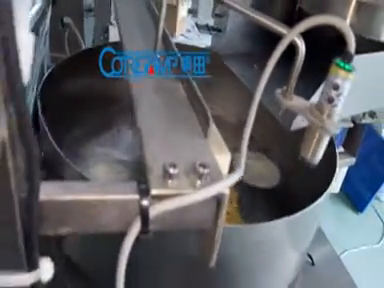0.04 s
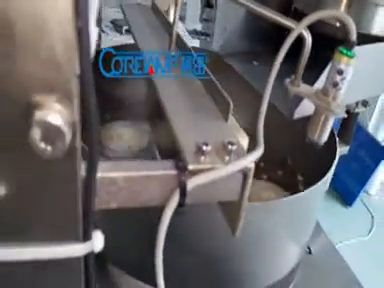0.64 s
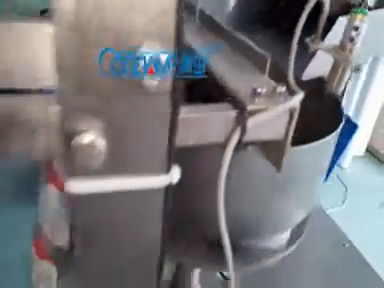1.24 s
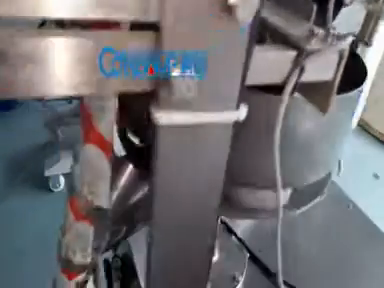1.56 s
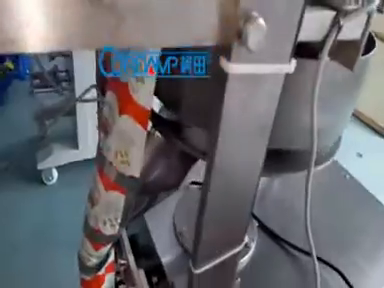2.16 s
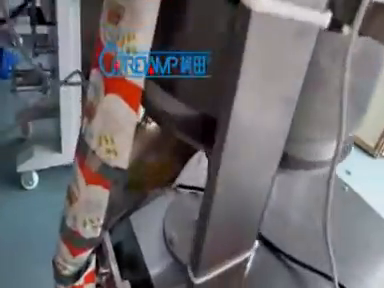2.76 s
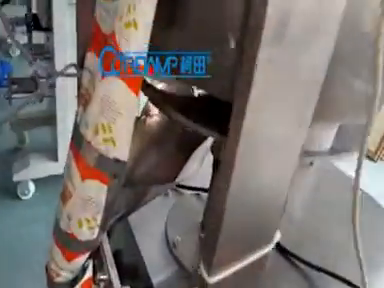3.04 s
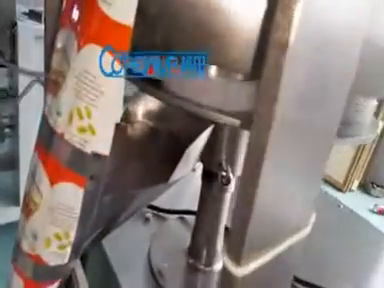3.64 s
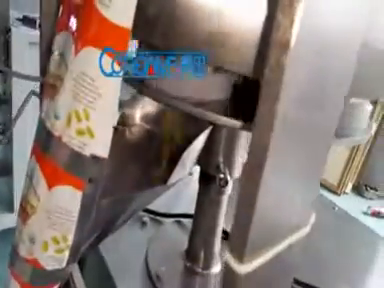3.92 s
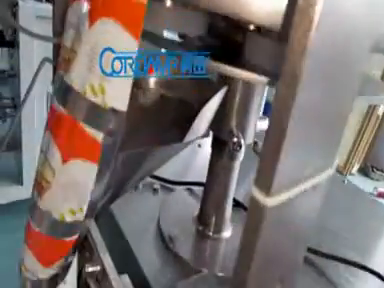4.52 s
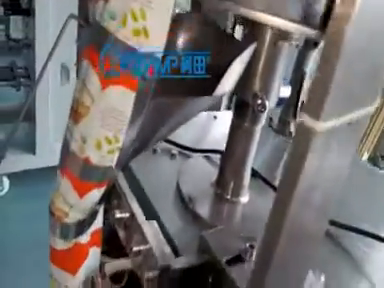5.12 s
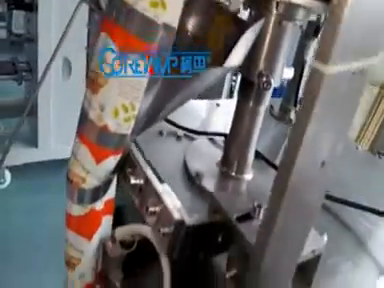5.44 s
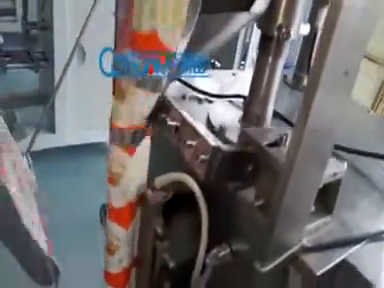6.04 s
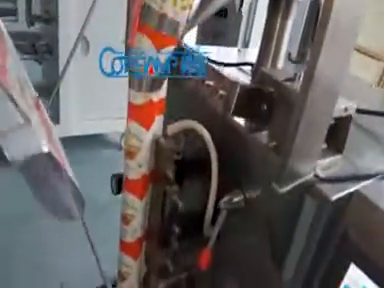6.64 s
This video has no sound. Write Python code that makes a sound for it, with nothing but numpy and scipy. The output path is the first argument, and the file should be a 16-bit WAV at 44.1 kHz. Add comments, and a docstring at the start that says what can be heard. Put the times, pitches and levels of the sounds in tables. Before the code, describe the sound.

A packing machine pours rattling nuts through a steel funnel into crackling plastic bags, its jaws clacking shut over a steady motor hum.

```python
"""Nuts hail onto a ringing steel funnel over the drone of a motor and gearbox.
This is a packing machine in a workshop, heard from close by, filling a bag every 1.35 s.
Each portion rattles and scrapes down a hollow tube and lands in crackling plastic film.
Dry parts squeak, the loose film guide clinks, and the sealing jaws clack shut before the next pour."""
import sys
import numpy as np
from scipy import signal
from scipy.fft import rfft, irfft, next_fast_len
from scipy.io import wavfile
from scipy.ndimage import map_coordinates

SR = 44100
rng = np.random.default_rng(int(sys.argv[2]) if len(sys.argv) > 2 else 0)


def wrap_up_sound(samples):
    """Save the sound to the file named by the first command line argument, as 16-bit audio."""
    columns = np.atleast_2d(samples).T
    # keep every value between -1 and 1, then stretch to whole-number steps
    tamed = np.clip(columns, -1, 1)
    steps = np.round(tamed * 32767).astype(np.int16)
    wavfile.write(sys.argv[1], SR, steps)


N = 298998

# Levels in all tables are relative. A fade time (t60) is the time a sound takes to drop 60 dB.
# The machine's cycles. Each row: time the jaws close in seconds; levels in dB of the clack, frame thud,
# pour, tube rattle, film crackle, drive load and the pour's dull blows; the clack's rise in seconds;
# the cutting blade's pitch in Hz and its level in dB.
CYCLES = [(-0.134, -10, -21, -15.5, -32, -26, -0.5, -36.5, 0.0004, 3300, -22),
          (1.218, -9.5, -19, -17, -28.5, -26.5, -6, -30, 0.00044, 3350, -17),
          (2.572, -8.5, -17, -17.5, -27.5, -26, -3.5, -31, 0.00057, 3360, -18),
          (3.925, -4, -21.5, -15, -28.5, -26, 2.5, -26, 0.0009, 3640, -14),
          (5.2735, -9.5, -16.5, -16, -30.5, -26, 0, -31, 0.002, 3570, -25),
          (6.632, -6.5, -20, -13, -21, -21, 0, -25.5, 0.0008, 3110, -18)]
CLOSE_S, CLACK_DB, _, POUR_DB, TUBE_DB, FILM_DB, LOAD_DB, BLOWS_DB, *_ = np.transpose(CYCLES)


def amp(db):
    """Turn decibels into a gain."""
    return 10 ** (np.asarray(db) / 20)


def unit(x):
    """Scale a signal to an average power of 1."""
    return x / np.sqrt(np.mean(x ** 2) + 1e-20)


def along(points, hz):
    """Read between (Hz, value) points on a musical pitch scale."""
    pitches, values = np.transpose(points)
    return np.interp(np.log(hz + 1), np.log(pitches), values)


def wobble(rate):
    """A smooth curve through rate random values a second."""
    steps = np.arange(0, N * rate / SR + 1, 1 / 10)
    curve = map_coordinates(rng.standard_normal(int(N * rate / SR) + 4), [steps])
    return np.interp(np.arange(N) * rate / SR, steps, curve)


def filtered(x, response):
    """Scale each frequency of x by response(Hz)."""
    size = next_fast_len(N + SR // 2)
    return irfft(rfft(x, size) * response(np.fft.rfftfreq(size, 1 / SR)), size)[..., :N]


def coloured(x, spectrum, size=4096):
    """Give x a tone colour, from (Hz, dB) points, with a filter of energy 1."""
    cepstrum = irfft(np.log(amp(along(spectrum, np.fft.rfftfreq(size, 1 / SR)))))
    cepstrum[1:size // 2] *= 2  # folded so the filter rings after a hit, never before
    cepstrum[size // 2 + 1:] = 0
    impulse = irfft(np.exp(rfft(cepstrum)))
    return signal.fftconvolve(x, impulse / np.linalg.norm(impulse))[:N]


def add(track, s, sound):
    """Mix a sound in at s seconds."""
    start = round(s * SR)
    sound = sound[max(-start, 0):]
    part = track[max(start, 0):][:len(sound)]
    part += sound[:len(part)]


def envelope(start, attack, hold, release):
    """Rise to 1 at start, hold, then fade. Times are in seconds; attack and release each span 20 dB."""
    t = np.arange(N) / SR - start
    early = np.maximum(-t, 0) / attack
    late = np.maximum(t - hold, 0) / release
    return amp(-20 * (early ** 2 + late))


def stage(levels_db, delay, **shape):
    """Repeat an envelope delay seconds after each closing of the jaws, at that cycle's level."""
    gains = [amp(db) * envelope(s + delay, **shape) for s, db in zip(CLOSE_S, levels_db)]
    return np.linalg.norm(gains, axis=0)


def impacts(rate, spread_db):
    """Random hits of uneven size, rate a second, with a steady average power of 1."""
    chance = np.clip(rate / SR, 1e-4, 1)
    sizes = amp(spread_db * np.clip(rng.standard_normal(N), -2, 2)) * rng.choice([-1, 1], N)
    return unit((rng.random(N) < chance) * sizes / np.sqrt(chance))


def bursts(rows, t60, attack):
    """A fading burst of noise for each (seconds, dB) row."""
    out, t = np.zeros(N), np.arange(SR // 3) / SR
    for s, db in rows:
        add(out, s, amp(db - 60 * t / t60) * (1 - np.exp(-t / attack)) * rng.standard_normal(len(t)))
    return out


def shimmer(hits, t60):
    """Each hit on a thin sheet wakes so many high notes that they blur into hiss."""
    decay = amp(-120 * np.arange(SR // 8) / SR / t60)
    energy = np.abs(signal.fftconvolve(hits ** 2, decay / decay.sum())[:N])
    return np.sqrt(energy) * rng.standard_normal(N)


def rasp(hz, width_hz, t):
    """A rough note kept ringing by irregular slips."""
    place = (t - t[0]) * width_hz
    slips = rng.standard_normal((2, int(place[-1]) + 2))
    a, b = [np.interp(place, np.arange(len(row)), row) for row in slips]
    return unit(a * np.cos(2 * np.pi * hz * t) + b * np.sin(2 * np.pi * hz * t))


def swell(rise, hz, roughness):
    """A note that grows for rise seconds, then falls; roughness is its width as a share of its pitch."""
    t = np.arange(-rise, rise, 1 / SR)
    return np.exp(-(2 * t / rise) ** 2) * rasp(hz, roughness * hz, t)


def tone(hz, drift, flutter_db):
    """A machine tone that wavers in level and pitch."""
    level = amp(flutter_db * wobble(12))
    return unit(level * np.sin(2 * np.pi * hz * np.arange(N) / SR + drift * wobble(9)))


def ring(modes, t, attack):
    """A struck part's own notes (modes) fade away, a little different in strength at each blow."""
    strengths_db = 1.5 * rng.standard_normal(len(modes))
    notes = [amp(db + extra_db - 60 * t / t60) * np.sin(2 * np.pi * (hz * t + rng.random()))
             for (hz, db, t60), extra_db in zip(modes, strengths_db)]
    return (1 - np.exp(-t / attack)) * sum(notes)


def pings(count, hz, octaves, t60, spread_db):
    """Scattered tiny ticks, each with its own pitch and size."""
    when, pitch, size = rng.random((count, 3)).T
    t = np.arange(SR // 40) / SR
    pitches = hz * 2 ** (octaves * (2 * pitch - 1))
    grains = amp(spread_db * size[:, None] - 60 * t / t60) * np.sin(2 * np.pi * pitches[:, None] * t)
    places = (when * N).astype(int)[:, None] + np.arange(len(t))
    return unit(np.bincount(places.ravel(), grains.ravel(), N)[:N])


def clink(hz, db, t60):
    """Loosely held steel buzzes as its ring dies away."""
    t = np.arange(SR // 8) / SR
    return amp(db - 3.5 - 60 * t / t60) * (1 - np.exp(-t / 0.0006)) * rasp(hz, 0.17 * hz, t)


def funnel_response(f):
    """Each note of the steel sheet boosts its own pitch and rings on."""
    # The sheet's notes. Each row: pitch in Hz, width in Hz, boost in dB.
    sheet_modes = [(902, 10, 13), (1424, 22, 11), (2013, 30, 8.5), (2340, 26, 7.5), (2434, 35, 8),
                   (3068, 107, 7.5), (3434, 65, 7.5), (3840, 56, 6.5), (5050, 78, 3.5), (5430, 39, 5.5),
                   (5730, 110, 7), (5350, 87, 1.5), (6170, 53, 9), (6400, 87, 3.5), (6460, 61, 9.5),
                   (7240, 52, 2)]
    return 1 + sum((amp(db) - 1) * 1j * f * width / (hz * hz - f * f + 1j * f * width)
                   for hz, width, db in sheet_modes)


def funnel():
    """Nuts hail on the steel funnel and ring it; a few film crackles share the same bright tone."""
    # Short bright bursts: clumps of nuts during the pours, and crackles of film as it is pulled.
    # Each row: start in seconds, level in dB, fade in seconds.
    bright_bursts = [(0.001, -6, 0.045), (0.018, -13, 0.093), (0.04, -12, 0.065), (0.063, -6.5, .08),
                     (0.09, -5.5, .06), (1.262, -15.5, .07), (1.2805, -8, 0.032), (1.323, -11.5, 0.036),
                     (1.3598, -12, .045), (1.4345, -8, 0.13), (2.6848, -13.5, 0.06), (2.709, -20, 0.094),
                     (3.415, -19.5, 0.079), (3.467, -18.5, .09), (3.9473, -12.5, 0.1), (4.005, -11.5, 0.14),
                     (4.048, -10, .11), (4.119, -8.5, 0.15), (4.386, -12, .11), (4.691, -9, 0.055),
                     (4.816, -15.5, 0.15), (5.3736, -9, 0.077), (5.43, -15, .06), (5.454, -8.5, 0.054),
                     (5.919, -12, 0.076), (6.709, -14, .1)]
    # Tone colours of the bright hits and the dull blows. Each row: frequency in Hz, level in dB.
    bright_colour = [(1300, -29.5), (2900, -10.5), (3700, -10), (4500, -5), (5300, -0.5), (5800, -1),
                     (6400, -7), (6800, -7.5), (7500, -15.5), (8400, -29), (10000, -24), (10700, -38)]
    dull_colour = [(500, -35), (900, -0.5), (1500, -4.5), (2400, 2), (3300, 6), (5000, -32.5)]
    # Notes set singing by where a pour lands. Each row: peak time and rise in seconds, Hz, level in dB.
    singing_notes = [(1.44, 0.09, 2044, -34), (1.44, 0.08, 2950, -37.5), (2.77, 0.12, 1977, -33),
                     (2.79, 0.1, 3080, -33), (2.79, 0.09, 3840, -31.5), (2.78, 0.14, 917, -40.5),
                     (4.2, 0.14, 2495, -33), (5.49, 0.09, 1450, -36), (5.49, 0.1, 6770, -27)]
    pouring = dict(delay=0.22, attack=0.12, hold=0.021, release=0.039)  # the cup empties
    pour = stage(POUR_DB, **pouring)
    slide = stage(POUR_DB, delay=0.16, attack=0.11, hold=0.25, release=0.24)  # nuts slide down the wall
    stream = amp(wobble(65)) * np.hypot(pour, amp(-6) * slide)  # they leave the cup in spurts
    contacts = impacts(4000 * (stream / stream.max() + 0.25), spread_db=2)  # denser in a heavy stream
    hits = stream * contacts
    hits += sum(bursts([(s, db)], t60, attack=0.038 * t60) for s, db, t60 in bright_bursts)
    sizzle = coloured(amp(-6) * hits + amp(-8.5) * shimmer(hits, t60=0.043), bright_colour)
    blows = coloured(stage(BLOWS_DB, **pouring) * contacts, dull_colour)
    out = filtered(sizzle + blows, funnel_response)
    for s, rise, hz, db in singing_notes:
        add(out, s - rise, amp(db) * swell(rise, hz, roughness=0.09))
    return out


def drive():
    """The motor hums; frame rumble, cabinet boom and gearbox whirr grow with each cycle's load."""
    # How loud the rumble and the hum are over time. Each row: time in seconds, level in dB.
    rumble_levels = [(0.05, -29), (1.03, -35.5), (2.95, -30), (3.13, -29), (3.43, -32.5), (4.8, -28.5),
                     (5.64, -33), (6.31, -28), (6.72, -31)]
    hum_levels = [(0.03, -29), (0.36, -42), (0.64, -31), (0.72, -39.5), (0.87, -37.5), (3.42, -50),
                  (4.58, -36), (4.61, -32), (5.08, -40), (5.8, -36), (5.97, -29), (6.16, -31.5),
                  (6.28, -26.5), (6.42, -27.5), (6.52, -32.5), (6.72, -32.5)]
    # Tone colours of the frame and the gearbox. Each row: frequency in Hz, level in dB.
    rumble_colour = [(8, -55), (22, -24), (40, -14), (65, -8.5), (88, -10.5), (115, -1.5), (145, 0),
                     (200, -1), (240, 0.5), (300, -8), (340, -19.5), (420, -16), (600, -18.5), (900, -78)]
    whirr_colour = [(180, -33), (300, -0.5), (406, 2.5), (451, -0.5), (548, -2.5), (647, -6.5), (730, -4.5),
                    (1030, -8), (1110, -9), (3720, -11.5), (4010, -10), (7210, -19), (8140, -29),
                    (9460, -77), (11000, -80), (14300, -80), (22000, -120)]
    # The motor's lasting tones. Each row: pitch in Hz, level in dB.
    motor_tones = [(86.3, -58.5), (132, -47.5), (231, -49), (1561, -57), (3908, -55.5), (4764, -56.5)]
    # Parts singing briefly under load. Each row: peak time and rise in seconds, Hz, level in dB.
    strains = [(0.391, 0.063, 102, -30), (0.305, 0.11, 213.2, -35.5), (3.23, 0.65, 133, -35.5),
               (3.463, 0.24, 1138, -38), (3.72, 0.24, 1172, -40), (4.646, 0.42, 3580, -36.5),
               (4.824, 0.21, 133.6, -27.5), (5.82, 0.3, 3180, -36), (6.05, 0.19, 133, -31),
               (6.42, 0.48, 86.4, -35), (1.922, 0.24, 109, -38), (3.767, 0.12, 104, -34),
               (5.049, 0.2, 230, -32.5)]
    t = np.arange(N) / SR
    rumble_db = np.interp(t, *np.transpose(rumble_levels))
    hum_db = np.interp(t, *np.transpose(hum_levels))
    load = stage(LOAD_DB, delay=0.504, attack=0.08, hold=0.041, release=0.31)
    drift_db = 0.22 * (rumble_db - rumble_db.mean())  # boom and whirr partly follow the rumble
    rumble = amp(rumble_db - 2 + 0.5 * load + 0.89 * wobble(7.5))
    rumble *= coloured(rng.standard_normal(N), rumble_colour)
    hum = amp(hum_db - 2) * tone(173, drift=0.4, flutter_db=-2)
    boom = amp(-41 + 6.5 * load + drift_db) * rasp(97, width_hz=38, t=t)
    whirr = amp(-35.5 + 5.5 * load + drift_db + 0.52 * wobble(11))
    whirr *= coloured(impacts(3000, spread_db=1.5), whirr_colour)
    tones = sum(amp(db) * tone(hz, drift=0.91, flutter_db=1.5) for hz, db in motor_tones)
    out = rumble + hum + boom + whirr + tones
    for s, rise, hz, db in strains:
        roughness = 0.08 if hz > 1000 else 0.012  # high notes rasp, low ones hum
        add(out, s - rise, amp(db) * swell(rise, hz, roughness))
    return out


def snaps():
    """A single nut hits steel or the film snaps: a sharp click, then a brief shiver."""
    # The snaps. Each row: start in seconds, level in dB.
    hits = [(0.0715, -9), (0.103, -9), (0.606, -14), (0.658, -12), (0.697, -11), (0.775, -12.5),
            (1.9092, -10.5), (1.9368, -8), (1.967, -12), (1.9968, -11), (2, -12), (2.038, -15),
            (3.2186, -11), (3.3458, -3), (3.3885, -4), (4.557, -5), (4.592, -4.5), (4.618, -8),
            (4.634, -7.5), (4.6896, -5), (4.728, -10), (4.738, -20), (4.768, -10.5), (5.915, -8),
            (5.9703, -12.5), (5.975, -10), (6.074, -8), (6.098, -9)]
    # Their tone colour. Each row: frequency in Hz, level in dB.
    snap_colour = [(1500, -26.5), (2800, -11), (3800, -2.5), (5000, -0.5), (6200, 2.5), (7000, -6.5),
                   (8500, -25), (10500, -25)]
    clicks, t = np.zeros(N), np.arange(SR // 50) / SR
    click_hz, click_t60 = 4800, 0.0013
    for s, db in hits:
        hz = click_hz * 2 ** (0.14 * rng.standard_normal())
        add(clicks, s, ring([(hz, db, click_t60)], t, attack=0.000088))
    shivers = bursts(hits, t60=0.016, attack=0.0001)
    return coloured(amp(2.5) * clicks + amp(-6) * shivers, snap_colour)


def tube_and_bag():
    """Nuts rattle down the hollow tube, and the film crackles as it fills and is pulled along."""
    # Tone colours of the tube and the film. Each row: frequency in Hz, level in dB.
    tube_colour = [(200, -14), (330, 2.5), (450, -8.5), (640, -6), (790, -9), (1000, 2), (1250, -3),
                   (1450, 3.5), (1700, 4.5), (2300, -0.5), (3300, 3), (5000, -69.5)]
    film_colour = [(600, -27), (1500, -14), (2400, -3.5), (3300, -6.5), (4200, -4.5), (5200, 2.5),
                   (6200, 2), (6800, -5.5), (7500, -14.5), (8500, -31.5), (10500, -28.5)]
    drop = stage(TUBE_DB, delay=0.582, attack=0.17, hold=0.045, release=0.2)
    pull = stage(FILM_DB, delay=0.6, attack=0.13, hold=0.28, release=0.21)
    drag = envelope(start=3.55, attack=0.23, hold=0.38, release=0.08)  # one return stroke scrapes
    jostle = amp(-8.5) * pull  # nuts settle in the bag
    rattle_gain = np.hypot(drop, jostle + amp(-35) * drag)
    crackle_gain = np.hypot(pull, amp(-33) * drag)
    knocks = pings(count=2500, hz=1030, octaves=0.535, t60=0.072, spread_db=21)
    rattle = amp(-4) * coloured(impacts(900, spread_db=0.5), tube_colour) + amp(-7.5) * knocks
    creases = shimmer(impacts(260, spread_db=4), t60=0.04)
    ticks = pings(count=4500, hz=4200, octaves=0.7, t60=0.02, spread_db=16)
    crackle = amp(-3.5) * creases + amp(-9) * ticks + amp(-7) * impacts(4000, spread_db=2.5)
    return rattle_gain * rattle + coloured(crackle_gain * crackle, film_colour)


def scrapes():
    """Each portion rubs down the tube in rough, rapid slips, sounding two of the tube's notes."""
    # The rubs. Each row: peak time in seconds, level in dB, pitch in Hz, rise in seconds.
    rubs = [(0.46, -29, 1083, 0.15), (1.822, -29, 1008, .15), (3.172, -27, 957, .17),
            (4.505, -28.5, 952, .17), (5.895, -30.5, 882, 0.17)]
    out = np.zeros(N)
    for s, db, hz, rise in rubs:
        overtone = amp(-7.5) * swell(rise, 1.55 * hz, roughness=0.5)
        add(out, s - rise, amp(db) * (swell(rise, hz, roughness=0.55) + overtone))
    return out


def squeaks():
    """The dry linkage and the film guide stick and slip in short, rough chirps."""
    # The chirps. Each row: peak time in seconds, level in dB, pitch in Hz, rise in seconds.
    chirps = [(0.386, -18, 2880, 0.01), (0.428, -19, 2850, 0.0084), (0.449, -22, 2780, 0.03),
              (0.503, -26, 2554, 0.037), (0.785, -31.5, 1102, 0.039), (3.089, -13, 3030, 0.0066),
              (6.237, -31, 896, 0.029)]
    out = np.zeros(N)
    for s, db, hz, rise in chirps:
        add(out, s - rise, amp(db - 2.5) * swell(rise, hz, roughness=0.5))
    return out


def guide_clinks():
    """The loose metal film guide is knocked and rings briefly as the film is pulled."""
    # The knocks. Each row: start in seconds, level in dB, pitch in Hz.
    knocks = [(0.682, -22, 1385), (0.713, -22, 1160), (0.804, -22.5, 890), (2.1445, -16, 2670),
              (3.366, -19, 950), (3.408, -18, 2510), (3.416, -19, 3130), (3.494, -18.5, 2390),
              (3.5195, -19.5, 2280), (3.539, -21, 2390), (3.559, -25.5, 2210), (4.662, -16, 2310),
              (4.7625, -21, 3600), (4.814, -23, 3480), (4.853, -16, 2276), (4.9187, -28, 2250),
              (6.0338, -19, 3030), (6.0602, -18, 3080), (6.2099, -18.5, 2230), (6.586, -23, 3090)]
    out = np.zeros(N)
    for s, db, hz in knocks:
        add(out, s, clink(hz, db, t60=0.042))
    return out


def jaws():
    """The jaws meet with a crack, bounce once and shake the frame; the linkage ticks between strokes."""
    # Notes of the struck jaws and frame. Each row: pitch in Hz, level in dB, fade in seconds.
    jaw_modes = [(870, -11, 0.016), (1083, 8, 0.016), (1170, 1, 0.019), (1420, -2.5, 0.02),
                 (1560, 0.5, 0.033), (2000, -3.5, 0.027), (2590, 0, 0.015), (3150, 3, 0.015),
                 (3630, -3.5, 0.025), (4440, -14, 0.04), (4890, -6, 0.03)]
    frame_modes = [(90, -3, 0.35), (134.5, 1.5, 0.23), (296.6, 0.5, 0.45), (331, -6.5, 0.25),
                   (401, -5, 0.25)]
    # Small knocks of the linkage. Each row: start in seconds, level in dB.
    linkage_knocks = [(1.1105, -15), (1.1265, -15.5), (1.156, -14.5), (1.694, -11.5), (2.476, -17.5),
                      (2.513, -21), (2.5533, -17), (2.56, -11.5), (2.5944, -12.5), (5.186, -17),
                      (5.217, -14.5), (5.229, -20), (6.179, -20), (6.556, -14), (6.5874, -19)]
    # Tone colours of the panels and the steel. Each pair: frequency in Hz, level in dB.
    panel_colour = [(50, -21), (90, -10), (280, -4.5), (420, 0), (650, -23), (1500, -80)]
    steel_colour = [(200, 1), (700, 7), (1200, 12), (2200, 7.5), (3200, 8), (6000, 11.5),
                    (7200, -3), (8500, -69)]
    ringing, t = np.zeros(N), np.arange(SR // 2) / SR
    for s, db, thud_db, *_, rise, blade_hz, blade_db in CYCLES:
        add(ringing, s, clink(blade_hz, blade_db, t60=0.038))  # pitch depends on where the blade bites
        add(ringing, s, amp(db - 18.5) * ring(jaw_modes, t, attack=rise))
        add(ringing, s + 0.004, amp(db - 13) * ring(jaw_modes, t, attack=0.0015))  # the bounce
        add(ringing, s, amp(thud_db - 8) * ring(frame_modes, t, attack=0.0054))
    panels = coloured(bursts(zip(CLOSE_S, CLACK_DB), t60=0.19, attack=0.013), panel_colour)
    cracks = sum(bursts([(s, db)], t60=0.028, attack=rise) for s, db, *_, rise, _, _ in CYCLES)
    shudder = bursts(zip(CLOSE_S, CLACK_DB), t60=0.49, attack=0.063)  # loose parts keep chattering
    ticks = bursts(linkage_knocks, t60=0.051, attack=0.0003)
    touches = bursts(zip(CLOSE_S - 0.006, CLACK_DB), t60=0.02, attack=0.0026)  # jaws touch film first
    contacts = amp(-10) * touches + amp(-5.5) * cracks + amp(-13) * shudder + amp(-10) * ticks
    return ringing + amp(-16) * panels + coloured(contacts, steel_colour)


def workshop(x):
    """The room's echo starts 5 ms late, and each frequency dies at its own speed."""
    # How long the room rings. Each row: frequency in Hz, fade in seconds.
    fade_times = [(150, 0.73), (2000, 0.79), (9000, 0.16)]
    hz, t, noise = signal.stft(rng.standard_normal(SR // 2), SR, nperseg=256)
    tail = signal.istft(noise * amp(-60 * t / along(fade_times, hz)[:, None]), SR, nperseg=256)[1]
    return signal.fftconvolve(np.pad(x, (SR // 200, 0)), tail / np.linalg.norm(tail))[:N]


def scene():
    """The machine stands straight ahead; only the room's echo gives a little width."""
    # Stereo width. Each row: frequency in Hz, level of the sides against the middle in dB.
    stereo_width = [(30, -19), (80, -40), (170, -55), (350, -30), (2000, -23), (6000, -19.5), (8500, -7.5)]
    work = funnel() + tube_and_bag() + snaps() + guide_clinks() + jaws() + scrapes() + squeaks()
    mid = amp(-1.5) * work + amp(-11.5) * workshop(work) + drive()
    side = filtered(workshop(mid), lambda hz: amp(along(stereo_width, hz)))
    return np.array([mid + side, mid - side]) * amp([[-0.2], [0.2]])


def record(dry):
    """Round off the highest peaks and keep only 10 to 10700 Hz."""
    rounded = dry / (1 + (dry / 0.85) ** 6) ** (1 / 6)
    return filtered(rounded, lambda hz: (hz > 10) & (hz < 10700))


dry = scene()
out = record(dry)
wrap_up_sound(out)
```